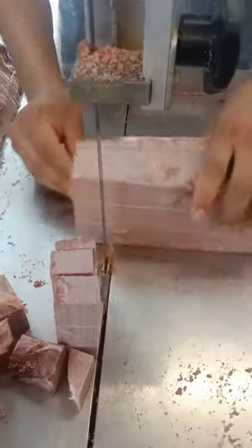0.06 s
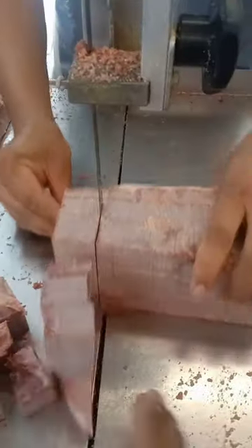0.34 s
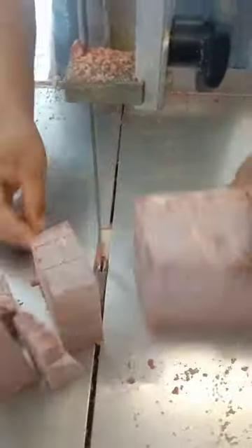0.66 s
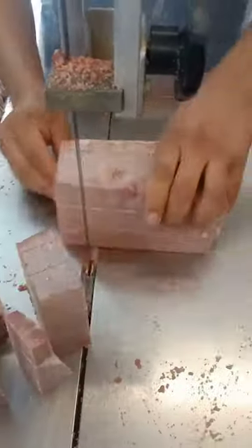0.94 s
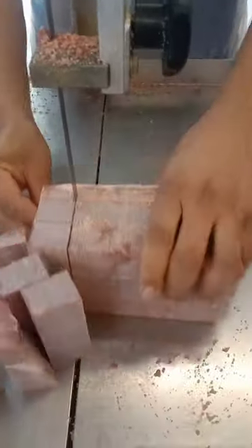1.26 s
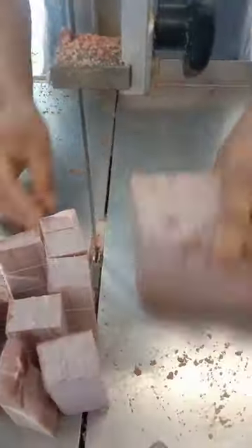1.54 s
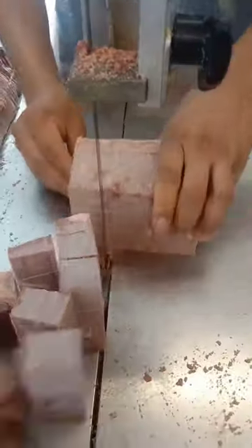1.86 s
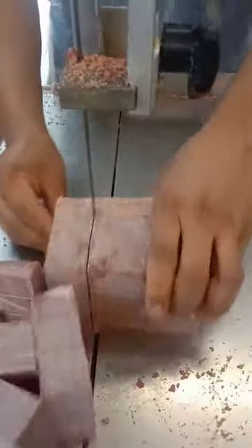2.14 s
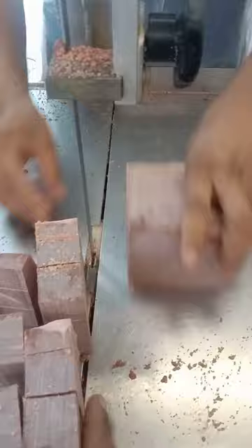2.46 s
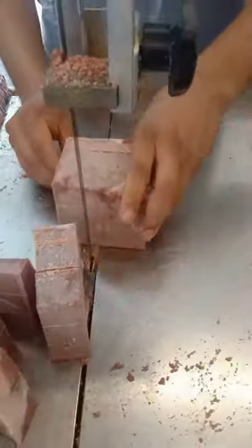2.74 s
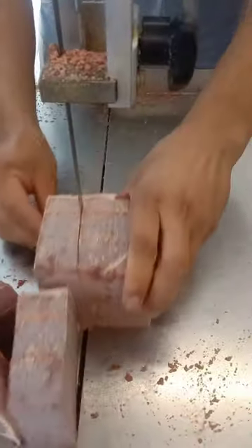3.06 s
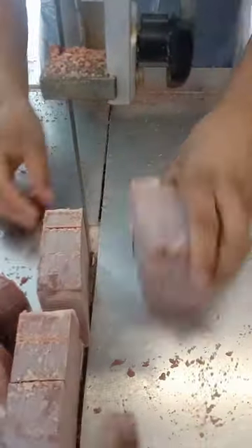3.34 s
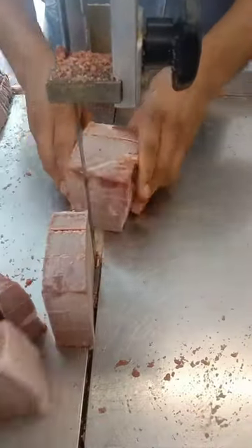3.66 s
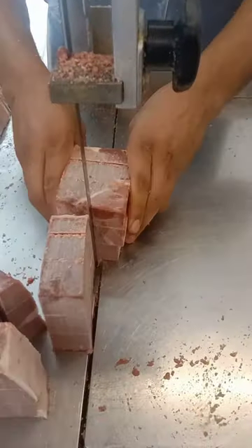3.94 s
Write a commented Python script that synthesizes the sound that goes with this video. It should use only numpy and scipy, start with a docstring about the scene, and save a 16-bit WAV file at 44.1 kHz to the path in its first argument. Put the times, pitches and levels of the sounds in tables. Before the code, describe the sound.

A butcher's band saw slices frozen meat in four short, hissing, buzzing cuts, heard up close. Between cuts the blade rattles and whistles over a motor hum, while pieces knock and thud on the steel table.

```python
"""A butcher's band saw slices a block of frozen meat, heard from close above its steel table.
In each cut the teeth buzz, rasp and hiss through the meat, now and then snagging with a squeal.
The free blade rattles in its guides, rings the frame and whistles; these sounds dip during each cut.
Hard pieces knock on the steel and blocks of meat thud onto the table.
Underneath, the motor hums and rumbles, and a low drone rises in pitch with each cut."""
import sys
import numpy as np
from scipy import signal
from scipy.fft import rfft, irfft
from scipy.io import wavfile
from scipy.ndimage import uniform_filter1d

SR = 44100
rng = np.random.default_rng(int(sys.argv[2]) if len(sys.argv) > 2 else 0)


def generate_wav(sig):
    """Save sig (samples, or channels by samples) to the path in sys.argv[1] as 16-bit PCM at SR."""
    pcm = np.round(np.clip(np.atleast_2d(sig).T, -1, 1) * 32767).astype(np.int16)
    wavfile.write(sys.argv[1], SR, pcm)


N = 176400

# Each pass of the meat through the blade:
# start_s, end_s, rasp_start_db, rasp_end_db, hiss_start_db, hiss_end_db, dip_db
CUTS = [(.196, 0.508, -6, -6.5, 4, 0.5, -9.5), (1.079, 1.399, 1, -2, 12, 7, -5.5),
        (1.962, 2.265, 2, -1.5, 10, 7.5, -6.5), (2.865, 3.251, 2, -3, 10.5, -1, -6),
        (3.939, 4.09, 0.5, 8.5, -1, 3, -8)]


def cutting_teeth(t, rasp, hiss, tooth_hz=980.4, buzz_db=-22.5, rasp_db=-24.5, hiss_db=-26.5):
    """Tooth after tooth strikes the meat, making a rough buzz with a puff of grit for each tooth."""
    # Tones in the buzz: multiple_of_tooth_rate, level_db
    harmonics = [(1, -10), (2, -5), (3, -6.5), (4, -6), (5, -1.5), (6, 3), (7, -0.5), (8, -15), (9, -12.5),
                 (10, -10.5), (11, -11.5), (12, -10), (13, -7), (14, -13), (15, -2)]
    # Tone colour of the rasping teeth: pitch_hz, level_db
    rasp_spectrum = [(250, -15), (600, -9.5), (950, -11), (1600, -8), (2300, -10.5), (2900, 1), (3700, -2),
                     (4250, -6), (4900, 3.5), (5750, 7), (6800, 3), (7400, -2), (8300, -13), (15000, -39)]
    # Tone colour of the cut's fine hiss: pitch_hz, level_db
    hiss_spectrum = [(4000, -41), (7000, -34), (8300, -7.5), (10500, -1.5), (12500, 1.5), (14000, 7.5),
                     (14900, 5), (15600, 14.5)]
    boost_db, slowing, squeal, octave = snags(t)
    drift = .002 * wander(25)
    jitter = (.008 + .5 * slowing) * wander(1500)  # a snag makes the teeth more uneven
    turns = np.cumsum(tooth_hz * (1 - slowing + drift + jitter)) / SR  # counts the passing teeth
    buzz = np.zeros(N)
    for multiple, level_db in harmonics:
        flutter_hz = 109.5 + 28.16 * multiple  # higher tones flutter faster
        buzz += gain(level_db + 2.7 * wander(40)) * rough_tone(multiple * turns, .7, flutter_hz)
    puffs = .5 + np.exp(-(turns % 1) / 0.28)
    grit = colour(puffs * grains(per_s=8500, spread_db=9), rasp_spectrum, ripple_db=1.5)
    spray = colour(puffs * grains(per_s=20000, spread_db=0), hiss_spectrum, ripple_db=-0.5)
    chatter = gain(1.5 * wander(90))
    sawing = gain(buzz_db + 0.27 * boost_db) * unit(buzz) + gain(rasp_db + boost_db) * grit
    hissing = gain(hiss_db + wander(63)) * spray
    squeals = squeal * np.sin(2 * np.pi * turns) + octave * np.sin(4 * np.pi * turns)
    return rasp * chatter * sawing + hiss * hissing + squeals


def snags(t):
    """Harder spots catch the teeth: for a moment the blade slows, rasps louder and squeals."""
    # Hard spots: time_s, half_length_s, rasp_boost_db, slowing_share, squeal_db, octave_above_db
    hard_spots = [(0.424, 0.0071, 7, 0.013, -49, -44), (1.133, 0.015, 6.5, .05, -26, -23),
                  (1.173, .007, 6, 0.0055, -33, -32), (1.285, .02, 5, .01, -45, -48),
                  (1.389, 0.011, 5, 0.014, -29, -21), (1.972, 0.0091, 1, .005, -23, -38),
                  (2.004, 0.0098, 0.5, .035, -34, -16.5), (2.281, 0.013, 4.5, .03, -21, -37),
                  (2.947, 0.0073, 0, 0.0059, -38, -36), (3.019, .015, 3, .002, -37, -30),
                  (3.249, .016, -2, .02, -26.5, -28), (3.999, 0.0096, 2, 0.0052, -35, -50)]
    boost_db, slowing, squeal, octave = np.zeros((4, N))
    for time_s, half_length_s, extra_db, slowing_share, squeal_db, octave_db in hard_spots:
        bump = np.exp(-.5 * ((t - time_s) / half_length_s) ** 2)
        boost_db += extra_db * bump
        slowing += slowing_share * bump
        squeal += gain(squeal_db) * bump
        octave += gain(octave_db) * bump
    return boost_db, slowing, squeal, octave


def cut_levels(t, entry_s=0.012, exit_s=0.06, dip_s=0.032, recover_s=0.023):
    """How strongly the teeth rasp and hiss, and how far the machine's sound dips, during each cut."""
    rasp, hiss, dip_db = np.zeros((3, N))
    for start, end, rasp_start, rasp_end, hiss_start, hiss_end, full_dip_db in CUTS:
        since_start, since_end = np.maximum(t - start, 0), np.maximum(t - end, 0)
        bite = np.minimum(since_start / entry_s, 1) * np.exp(-since_end / exit_s)
        rasp += bite * gain(np.interp(t, [start, end], [rasp_start, rasp_end]))
        hiss += bite * gain(np.interp(t, [start, end], [hiss_start, hiss_end]))
        dip = (1 - np.exp(-since_start / dip_s)) * np.exp(-since_end / recover_s)
        dip_db += full_dip_db * dip
    return rasp, hiss, dip_db


def free_blade(dip_db, tooth_hz=987):
    """The running blade rattles and scrapes in its guides, rings the frame and whistles."""
    # Tone colour of the rattle: pitch_hz, level_db
    rattle_spectrum = [(200, -52), (400, -15.5), (560, -15.5), (680, -6.5), (820, 0), (1100, 0.5),
                       (1450, -1), (1750, -4), (2200, -10), (2700, -7), (3400, -8.5), (4200, -14.5),
                       (8000, -34)]
    # How the rattle swells and fades: time_s, level_db
    rattle_levels = [(0, 3), (.07, -2), (.17, 3), (.5, -4.5), (.72, 1), (.8, 0), (1.04, 1.5), (1.45, 0),
                     (1.65, 1), (1.95, 1), (2.4, -1), (2.84, 0.5), (3.3, -1), (3.55, 0), (3.72, 0),
                     (4, -2.5)]
    # Ringing notes of the blade and frame: pitch_hz, width_hz, level_db
    frame_notes = [(255.7, 10, -1), (818, 26, 2), (944, 28, -4.5), (1050, 55, -4.5), (1286.6, 25, 4),
                   (1454, 100, -19), (1538, 62, 1), (1661.4, 17, 4), (1880, 46, 4)]
    # Tone colour of the blade scraping its guides: pitch_hz, level_db
    scrape_spectrum = [(2000, -1), (4200, -14), (4700, 1), (5300, 3.5), (5900, -1), (6500, 0.5), (7200, -6),
                       (8200, -14), (11300, -15.5), (12000, -13.5), (12700, -16), (15300, -13)]
    # Thin, high ringing notes of the blade: pitch_hz, width_hz, level_db
    blade_notes = [(2906, 120, -2), (3360, 13, -24), (5170, 90, 1.5), (5490, 60, 1), (5886, 150, 4.5),
                   (6500, 120, -3), (6900, 57, -3.5), (7130, 69, 0), (7750, 60, -11)]
    # How the whistle of the free teeth swells and fades: time_s, level_db
    whistle_levels = [(0, -4), (.65, -33), (.85, 4.5), (.98, 14.5), (1.1, 0), (1.5, -4), (1.73, 8.5),
                      (1.95, 3.5), (2.4, -2), (2.8, 4), (3.4, 0.5), (3.75, 7), (4, 0.5)]
    shake = gain(1.15 * wander(110))
    rattle = gain(-26) * colour(shake * grains(per_s=3500, spread_db=3), rattle_spectrum, ripple_db=3.5)
    frame_ring = gain(-31) * ringing(shake * grains(per_s=3000, spread_db=0.5), frame_notes)
    rub = gain(1.6 * wander(60)) * grains(per_s=6000, spread_db=3.5)
    scrape = gain(-28) * colour(rub, scrape_spectrum, ripple_db=4.5)
    blade_ring = gain(-33) * ringing(grains(per_s=5100, spread_db=0), blade_notes)
    turns = np.cumsum(tooth_hz * (1 + 0.00428 * wander(60))) / SR
    whistle_db = -39 + curve(whistle_levels) + 2.8 * wander(35.7)
    whistle = np.sqrt(2) * np.sin(2 * np.pi * turns) * gain(whistle_db)
    clatter = (rattle + frame_ring) * gain(curve(rattle_levels))
    return gain(dip_db) * (clatter + whistle) + gain(1.8 * dip_db) * (scrape + blade_ring)


def knocks(t, crack_s=0.0052, contact_s=.011):
    """Hard pieces strike the steel: a brief rough contact cracks and sets low and high notes ringing."""
    # Each knock: start_s, low_ring_db, high_ring_db, crack_db, stretch (multiplies all its fade times)
    hits = [(.046, -5.5, -13.5, -12.5, 0.98), (.110, -5.5, -33, -22, 1.2), (.219, -11.5, -8, -17.5, 1),
            (0.349, -22, -34, -25, 1.1), (1.894, -17, -27, -35, .8), (2.32, -18, -37, -28, 1),
            (2.738, -16, -22, -18, 0.54), (3.746, -15, -29, -28, 0.14)]
    # Low notes of the steel: pitch_hz, fade_s (to fall 60 dB, before stretching), level_db
    low_notes = [(1300, 0.054, -41), (1435, 0.057, 11.5), (1560, 0.023, 13.5), (1657, 0.18, -22.5),
                 (1890, 0.11, -2)]
    # High notes of the steel: pitch_hz, fade_s (as above), level_db
    high_notes = [(2610, .04, -27), (3480, 0.025, 7), (4400, 0.034, 1), (4800, 0.041, -13),
                  (5450, 0.028, 11.5), (5600, .06, -17.5), (6060, 0.025, 10), (6570, 0.033, -16)]
    out, age = np.zeros(N), t[:SR // 4]
    low_cut = signal.butter(2, 990, "high", fs=SR, output="sos")  # the knocks carry little bass
    for start_s, low_db, high_db, crack_db, stretch in hits:
        fade_age = age / stretch
        crack = resonate(rng.standard_normal(len(age)), pitch_hz=2730, width_hz=1100)
        parts = [(crack * np.exp(-fade_age / crack_s), crack_db)]
        for notes, ring_db in ((low_notes, low_db), (high_notes, high_db)):
            ring = sum(gain(db - 60 * fade_age / fade_s) * np.sin(2 * np.pi * hz * age)
                       for hz, fade_s, db in notes)
            contact = 0.12 * rng.standard_normal(len(age)) * np.exp(-fade_age / contact_s)
            contact[0] = 1  # the first sharp tap
            parts.append((signal.fftconvolve(contact, ring)[:len(age)], ring_db))
        knock = sum(gain(db) * part / np.std(part[:SR // 100]) / 2 for part, db in parts)
        out += np.interp(t - start_s, age, signal.sosfilt(low_cut, knock), left=0, right=0)
    return out


def thuds(t, decay_s=0.036):
    """Blocks of meat land on the table, which booms briefly."""
    # Meat set down: start_s, level_db, pitch_hz, width_share (of the pitch)
    landings = [(.08, -34.5, 235, 0.26), (0.138, -38, 75, 0.73), (0.591, -46, 98, 0.22),
                (0.724, -31.5, 340, 0.74), (0.728, -38, 109, 0.64), (.795, -45, 80, 0.65),
                (1.124, -40, 132, 0.26), (1.475, -31.5, 370, .6), (1.77, -43, 132, 0.4),
                (2.129, -42, 142.4, 0.66), (1.896, -38.5, 74, .7), (2.325, -29.5, 423, 2.6),
                (2.81, -35, 325, 0.78), (2.84, -40, 96, 0.52), (2.921, -33.5, 142, 0.27),
                (3.181, -38, 122, 0.57), (3.271, -35, 129.6, .4), (3.636, -40, 79.1, 1),
                (3.69, -31, 246, 0.76), (3.78, -34.5, 257, 0.49), (3.885, -36, 346, 0.33)]
    out, age = np.zeros(N), t[:SR // 3]
    for start_s, level_db, pitch_hz, width_share in landings:
        push = rng.standard_normal(len(age)) * np.exp(-age / decay_s)
        width_hz = width_share * pitch_hz
        boom = resonate(resonate(push, pitch_hz, width_hz), pitch_hz, width_hz)
        boom /= np.std(boom[:SR // 20])
        out += gain(level_db) * np.interp(t - start_s, age, boom, left=0, right=0)
    return out


def drone(t, dip_db, idle_hz=318, loaded_hz=380, settle_s=0.074):
    """The machine drones unsteadily, higher under load; its level dips along with the blade's rattle."""
    load = np.zeros(N)
    for start, end, *_ in CUTS:
        load += np.clip((t - start) / .1, 0, 1) * np.exp(-np.maximum(t - end - .15, 0) / settle_s)
    turns = np.cumsum(idle_hz + (loaded_hz - idle_hz) * np.minimum(load, 1)) / SR
    tone = rough_tone(turns, roughness=1.4, flutter_hz=85) * gain(2.65 * wander(14))
    return unit(tone) * gain(-38.5 + 0.8 * dip_db)


def motor(t, hum_hz=101.6):
    """The electric supply makes the motor hum, and the wheels rumble in the cabinet."""
    # Tone colour of the rumble: pitch_hz, level_db
    rumble_spectrum = [(25, -23), (60, -13.5), (100, -3), (140, -3.5), (180, -7.5), (225, -6), (260, -7.5),
                       (290, 2), (390, -5.5), (450, -9.5), (700, -5.5), (1500, -28)]
    # How hum and rumble swell and fade together: time_s, level_db
    motor_levels = [(0, 3), (.25, 1.5), (.45, -4.5), (.62, 1.5), (1.0, -1), (1.3, -3.5), (1.5, 5),
                    (2.15, 4), (2.3, 2.5), (2.45, 3), (2.75, 4), (2.95, -11), (3.07, 0.5), (3.3, -1),
                    (3.8, 3.5), (4, -10)]
    hum = np.sqrt(2) * np.sin(2 * np.pi * hum_hz * t + 0.1 * wander(8.6))
    hum *= gain(-53.5 + 2 * wander(9))
    rumble = gain(-42 + 1.3 * wander(22)) * colour(rng.standard_normal(N), rumble_spectrum)
    return (hum + rumble) * gain(curve(motor_levels))


def gain(db):
    """Turn decibels into a number to multiply by."""
    return 10 ** (np.asarray(db) / 20)


def unit(x):
    """Scale a signal to an average strength (rms) of 1."""
    return x / np.sqrt(np.mean(x ** 2) + 1e-18)


def curve(points):
    """Join (time_s, value) points with straight lines."""
    return np.interp(np.arange(N) / SR, *np.array(points).T)


def wander(rate_hz):
    """Smooth random motion with a typical size of 1."""
    step = max(int(SR / rate_hz), 2)
    held = rng.standard_normal(N // 2 + 2)[np.arange(N) // step]
    return unit(uniform_filter1d(uniform_filter1d(held, step), step))


def grains(per_s, spread_db):
    """A dense stream of tiny impacts; spread_db makes their sizes uneven."""
    clicks = (rng.random(N) < per_s / SR) * np.sign(rng.standard_normal(N))
    sizes = gain(spread_db * np.clip(rng.standard_normal(N), -2, 2))
    return unit(clicks * sizes)


def rough_tone(turns, roughness, flutter_hz):
    """A tone whose strength and phase flutter at random; turns counts its cycles."""
    tone = (1 + roughness * wander(flutter_hz)) * np.cos(2 * np.pi * turns)
    return tone + roughness * wander(flutter_hz) * np.sin(2 * np.pi * turns)


def colour(x, spectrum, ripple_db=0):
    """Give x a tone colour, with random ripples for the steel's many close resonances."""
    pitch_hz, level_db = np.array(spectrum).T
    freqs = np.maximum(np.fft.rfftfreq(N, 1 / SR), 1)
    ripple_hz = np.arange(0, SR / 2, 35)
    ripple = ripple_db * np.interp(freqs, ripple_hz, rng.standard_normal(len(ripple_hz)))
    shape_db = np.interp(np.log(freqs), np.log(pitch_hz), level_db) + ripple
    bass_fade = np.minimum(freqs / pitch_hz[0], 1) ** 2
    return unit(irfft(rfft(x) * gain(shape_db) * bass_fade, N))


def resonate(x, pitch_hz, width_hz):
    """One resonance: keep the part of x that lies near a pitch."""
    return signal.lfilter(*signal.iirpeak(pitch_hz, pitch_hz / width_hz, fs=SR), x)


def ringing(x, notes):
    """Let x ring a set of resonances, each applied twice to make it sharper."""
    return unit(sum(gain(db) * resonate(resonate(x, hz, width), hz, width) for hz, width, db in notes))


def scene():
    """Saw, meat and table, the same in both ears."""
    t = np.arange(N) / SR
    rasp, hiss, dip_db = cut_levels(t)
    blade = cutting_teeth(t, rasp, hiss) + free_blade(dip_db)
    mono = blade + drone(t, dip_db) + motor(t) + knocks(t) + thuds(t)
    return np.array([mono, mono])


def record(dry, top_hz=15550):
    """Round off the loudest peaks and remove the highest treble."""
    high_cut = signal.ellip(10, .2, 80, top_hz, fs=SR, output="sos")
    return signal.sosfilt(high_cut, np.tanh(dry))


dry = scene()
out = record(dry)
generate_wav(out)
```